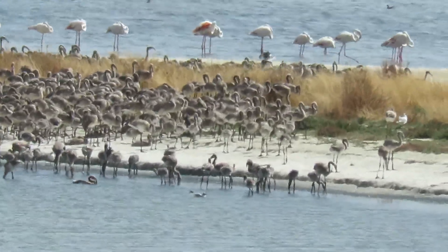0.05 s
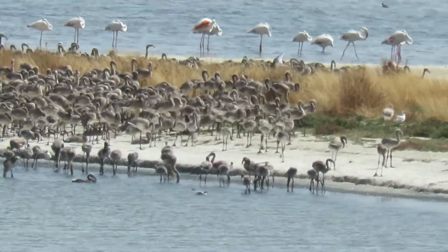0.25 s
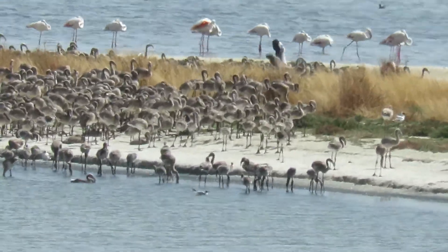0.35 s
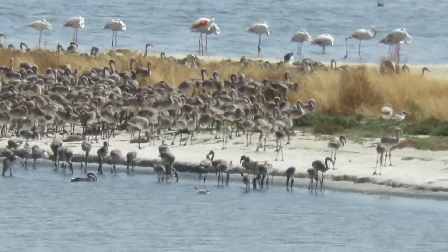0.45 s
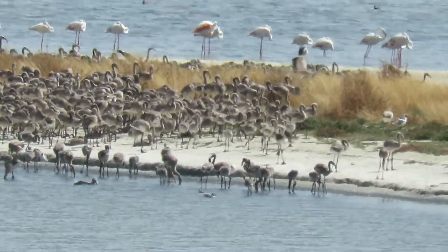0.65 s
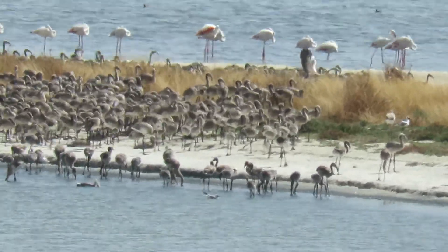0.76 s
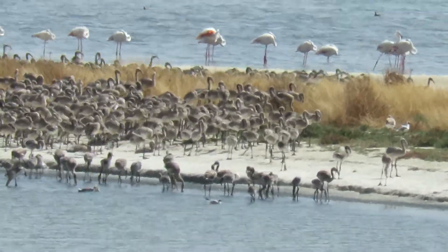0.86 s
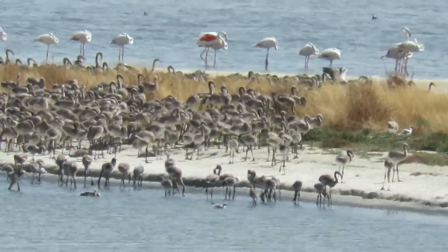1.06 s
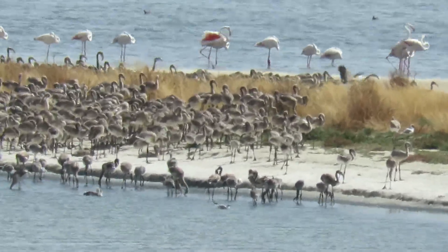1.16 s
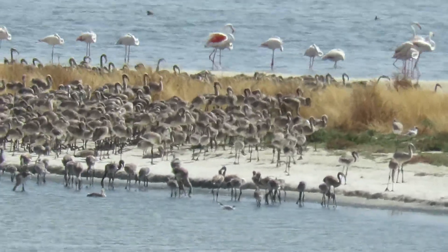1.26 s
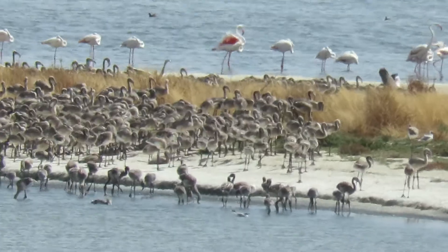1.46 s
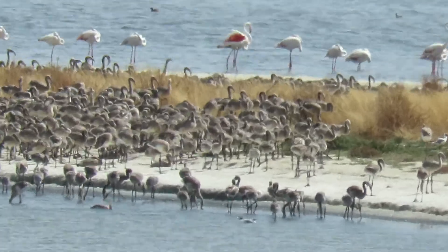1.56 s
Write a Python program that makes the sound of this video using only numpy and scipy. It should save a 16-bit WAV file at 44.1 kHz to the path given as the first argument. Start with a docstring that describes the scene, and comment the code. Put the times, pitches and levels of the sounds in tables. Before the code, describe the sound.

A hoarse flamingo caw sounds by a lake as low wind gusts buffet and briefly crackle the microphone. The wind drops and two more throbbing caws follow, with a faint hush of far flock and water behind.

```python
"""Flamingos call across a lake. From the start, over the colony's faint din and a breeze, comes a harsh caw:
a nasal harmonic voice that scoops up, throbs through a windpipe resonance and turns hoarse as it falls.
Eddies thump on the microphone and an insect buzzes briefly. The hardest gusts make the microphone
crackle, and just after half a second its port flutters. As the wind eases the caw comes twice more,
each time with short echoes off ground and water, and a faint fourth begins at the very end."""
import sys
import numpy as np
from scipy import signal
from scipy.fft import rfft, irfft
from scipy.io import wavfile
from scipy.ndimage import uniform_filter1d, minimum_filter1d

SR = 44100
rng = np.random.default_rng(int(sys.argv[2]) if len(sys.argv) > 2 else 0)


def output_pcm(signal):
    """Save a mono or channel-first signal as 16-bit PCM at the path in sys.argv[1].

    Samples are clipped to [-1, 1] before scaling.
    """
    pcm = np.clip(np.atleast_2d(signal).T, -1, 1) * 32767
    wavfile.write(sys.argv[1], SR, np.round(pcm).astype(np.int16))


N = 70560
TIME = np.arange(N) / SR

# wash of distant colony and water: frequency_hz, relative_density_db
COLONY_SPECTRUM = [(30, -4.5), (200, 6), (400, -2), (600, -3.5), (900, -5), (1300, -6.5), (2200, -12),
                   (4000, -18), (7000, -24), (10000, -29.5), (12500, -28.5), (14000, -43.5)]
# its level, which dips after the big gusts: time_s, level_db
COLONY_LEVEL = [(0, -53), (.2, -49.5), (.28, -59), (.48, -57), (.62, -58), (1.0, -59.5), (1.25, -55),
                (1.6, -54.5)]
# likeness of its left and right sides: frequency_hz, correlation
COLONY_CORRELATION = [(100, 1), (600, 1), (1500, 0.3), (4000, 0.062), (9000, 0.021)]

# wind between the thumps: time_s, level_db
BREEZE_LEVEL = [(0, -47), (.07, -42.5), (.13, -71), (.2, -38.5), (.4, -47), (.47, -40.5), (.6, -35),
                (.69, -43.5), (.79, -56.5), (.89, -49.5), (1.05, -83.5), (1.17, -64.5), (1.29, -68),
                (1.35, -46.5), (1.39, -64), (1.5, -55.5), (1.6, -56.5)]
# its spectrum: frequency_hz, relative_density_db
BREEZE_COLOUR = [(30, -28.5), (70, -8.5), (140, 1.5), (230, -4.5), (380, -2), (550, -21.5), (1000, -25.5),
                 (3000, -68.5)]

# the calls: start_s, top_pitch_hz, level_db, windpipe_gain_db, treble_gain_db, beak_end_hz, squeak_db
CAW_EVENTS = [(-.006, 521.6, -48, 1, -6, 3990, -72), (0.627, 509.6, -54, 4, 2.5, 4170, -55.5),
              (1.273, 515.2, -50.5, 6.5, 2, 3390, -48), (1.561, 605, -73, 0, 14, 3800, -64)]
# arch of every caw: age_s, share_of_top_pitch, gain_db, hoarseness (0-1)
CAW_ARCH = [(0, .63, -16, .4), (.02, .81, -2, .25), (.032, .89, 0, .1), (.048, .955, -3, .24),
            (.1, 1, 1.5, .27), (.145, .99, 1.5, .3), (.19, .93, 1.5, .36), (.245, .84, 0, .35),
            (.275, .79, -13, .5), (.31, .76, -36, .5)]
# modulation, deepening until late in the caw: age_s, pitch_swing_share, drive_swing_share
THROB_DEPTH = [(.03, 0, .1), (.08, .024, .9), (.13, .038, 1.1), (.18, .058, 1.5), (.22, .058, 1.5),
               (.27, .04, .7)]
# formants of the throat: frequency_hz, gain_db
THROAT_RESPONSE = [(500, -31.5), (850, -21.5), (1040, -4.5), (1150, 2), (1300, 4.5), (1500, -1.5),
                   (1720, 2.5), (1850, -2), (2060, -4), (2220, -12.5), (2580, -17), (2850, -34.5),
                   (4300, -25.5), (4700, -33), (5250, -22.5), (5600, -27.5), (6050, -22), (6800, -33.5),
                   (11000, -44)]
# the voice brightens as it is pushed: age_s, gain_above_4_khz_db
BRIGHTENING = [(0, -14), (.06, -5), (.11, -0.5), (.24, 0.5), (.3, 4.5)]
CAW_S, THROB_HZ, THROB_SLOWS_HZ_PER_S = .31, 60, 88
JITTER, RASP, BREATH_DB, TREBLE_FLICKER_DB = .006, .8, -1, 2.2
BEAK_HZ, BEAK_HALF_WIDTH_HZ, BEAK_DB, BEAK_OPENS_S, BEAK_TAKES_S = 3470, 230, -14.5, .16, .033
WINDPIPE_HZ, WINDPIPE_HALF_WIDTH_HZ = 1520, 85
SQUEAK_S, SQUEAK_SIGMA_S, SQUEAK_HARMONIC = .031, .006, 7
LEFT_LEAD_S, PAN_DB, SHORE_DB, SHORE_T60_S = .00003, .37, -12, .14

# eddies striking the microphone: centre_s, sigma_s, level_db, upper_edge_hz
EDDIES = [(0.022, 0.027, -47, 326), (0.068, 0.0063, -36, 360), (0.202, 0.0045, -17.5, 500),
          (0.224, 0.0048, -9.5, 644), (0.244, 0.0046, -22.5, 972), (0.254, 0.011, -17, 530),
          (0.276, 0.0038, -15, 597), (0.294, 0.011, -23, 495), (0.342, 0.0014, -24, 364),
          (.367, 0.0074, -22.5, 440.6), (0.386, 0.013, -30.5, 395), (0.423, 0.0026, -28.5, 275),
          (0.455, 0.0028, -36, 377), (0.506, 0.0056, -21, 291), (0.515, 0.0039, -22, 496),
          (0.536, 0.012, -20, 393), (0.555, 0.0065, -13.5, 629), (0.57, 0.0032, -13.5, 762),
          (0.582, 0.0033, -16, 480), (0.687, 0.0029, -33.5, 390), (0.764, 0.0015, -38.5, 366),
          (0.953, 0.0066, -43.5, 314), (0.979, 0.015, -42, 325), (1.023, 0.0069, -44.5, 320),
          (1.106, 0.0039, -50.5, 242), (1.218, 0.0061, -38.5, 268), (1.264, 0.0025, -36, 265),
          (1.412, 0.0025, -33, 164), (1.431, 0.0062, -27, 427), (1.463, 0.0036, -30.5, 398),
          (1.476, 0.0024, -28.5, 340), (1.528, 0.02, -42.5, 257)]
EDDY_LOW_EDGE_SHARE, EDDY_SIDE_DB, EDDY_SIDE_ABOVE_HZ = .31, -7.5, 446
PORT_DIP_HZ, PORT_DIP_SIGMA_HZ, PORT_DIP_DB = 558.6, 44, -10.5   # hollow just above the port's resonance

# the insect's buzz: time_s, level_db
INSECT_LEVEL = [(.11, -100), (.135, -74), (.22, -73), (.24, -77.5), (.325, -77), (.335, -110)]
INSECT_HZ, INSECT_HALF_WIDTH_HZ, INSECT_PULSE_HZ = 11900, 325, 118

# crackles of the microphone: start_s, impulse_db (before filtering)
CRACKLE_IMPULSES = [(.224, -33), (.2268, -48.5), (.2345, -34), (.239, -26.5), (0.2445, -25), (0.256, -30),
                    (0.276, -40), (0.5441, -26), (.565, -21), (.57, -34), (.586, -30)]
# ringing of the microphone port: time_s, level_db
PORT_LEVEL = [(.535, -61.5), (.541, -11), (.557, -8.5), (.563, -27.5), (.571, -6), (.578, -24.5),
              (.583, -13), (.588, -51.5)]
PORT_HZ, PORT_WANDER = 405.9, .06


def from_db(db):
    """Amplitude ratio for a level in decibels."""
    return 10 ** (np.asarray(db) / 20)


def rms_one(x):
    """Normalisation to unit power."""
    return x / np.sqrt(np.mean(x ** 2) + 1e-20)


def along(rows, t):
    """Linear interpolation of each column of a curve at times t."""
    times, *columns = np.transpose(rows)
    return [np.interp(t, times, column) for column in columns]


def burst(rows):
    """Amplitude envelope from a level curve, silent outside it."""
    return from_db(np.interp(TIME, *np.transpose(rows), left=-200, right=-200))


def at_hz(points, hz):
    """Interpolation of a spectrum on a log-frequency axis."""
    frequencies, values = np.transpose(points)
    return np.interp(np.log(hz), np.log(frequencies), values)


def filtered(x, hz, kind, order=2):
    """Causal Butterworth filter."""
    return signal.sosfilt(signal.butter(order, hz, kind, fs=SR, output="sos"), x)


def drift(hz, size=N):
    """Random fluctuation: low-passed noise of unit power."""
    return rms_one(filtered(rng.standard_normal(size + SR // 4), hz, "low")[-size:])


def stereo(mid, side):
    """Left and right as the sum and difference of mid and side."""
    return np.array([mid + side, mid - side])


def coloured_noise(spectrum, correlation):
    """Partly correlated stereo noise of unit power, summed from half-octave bands."""
    edges = 25 * 2 ** np.arange(0, 9.6, .5)
    out, white = 0, rng.standard_normal((2, 2, N))
    for k, (low, high) in enumerate(zip(edges, edges[1:])):
        mid, side = filtered(white[k % 2], [low, high], "band", order=3)
        hz = np.sqrt(low * high)
        alike = at_hz(correlation, hz)
        band = stereo(np.sqrt(1 + alike) * mid, np.sqrt(1 - alike) * side)
        out = out + from_db(at_hz(spectrum, hz)) * band
    return rms_one(out)


def colony():
    """Diffuse field: the far flock and water merge into noise, alike in both ears only in the bass."""
    db, = along(COLONY_LEVEL, TIME)
    return from_db(db) * coloured_noise(COLONY_SPECTRUM, COLONY_CORRELATION)


def breeze(lumps_db=.5):
    """Turbulence: uneven wind noise with most of its energy at low frequencies."""
    db, = along(BREEZE_LEVEL, TIME)
    envelope = from_db(db + lumps_db * drift(32))
    return envelope * coloured_noise(BREEZE_COLOUR, correlation=[(100, 1), (800, .89)])


def caw(age, top_hz, db, windpipe_db, treble_db, beak_end_hz, squeak_db):
    """Source and filter: rough, modulated harmonics excite the resonances of throat, beak and windpipe."""
    size = len(age)
    pitch_share, arch_db, hoarse = along(CAW_ARCH, age)
    pitch_swing, drive_swing = along(THROB_DEPTH, age)
    bright_db, = along(BRIGHTENING, age)
    throb_phase = 2 * np.pi * (THROB_HZ * age - .5 * THROB_SLOWS_HZ_PER_S * age ** 2) + .75
    throb = -np.sin(throb_phase) - .3 * np.sin(2 * throb_phase)   # climbs slowly and drops fast
    effort = from_db(db + arch_db) * (1 + .4 * drive_swing * throb)
    pitch = top_hz * pitch_share * (1 + pitch_swing * throb + JITTER * drift(130, size))
    phase = 2 * np.pi * np.cumsum(pitch) / SR
    beak_opening = np.clip((age - BEAK_OPENS_S) / BEAK_TAKES_S, 0, 1)
    beak_hz = BEAK_HZ + (beak_end_hz - BEAK_HZ) * beak_opening
    source, voice = 0, 0
    for k in range(1, 23):
        hz = k * pitch
        throat = from_db(at_hz(THROAT_RESPONSE, hz) + bright_db * (hz > 4000))
        beak = from_db(BEAK_DB) / (1 + ((hz - beak_hz) / BEAK_HALF_WIDTH_HZ) ** 4)
        treble_share = np.clip(np.log2(hz / 2000), 0, 1)
        treble = from_db((treble_db + TREBLE_FLICKER_DB * drift(60, size)) * treble_share)
        # random modulation spreads each harmonic into noisy sidebands
        rasp = RASP * hoarse * np.sqrt(k / 2)
        grain = rasp * (drift(91, size) + 1j * drift(110, size))
        breath = from_db(BREATH_DB) * hoarse * drift(270, size)
        carrier = np.exp(1j * (k * phase + 2 * np.pi * rng.random()))
        partial = effort / np.sqrt(.5 + rasp ** 2) * np.real((1 + grain + breath) * carrier)
        source = source + partial
        voice = voice + (throat + beak) * treble * partial
    squeak_envelope = from_db(squeak_db) * np.exp(-.5 * ((age - SQUEAK_S) / SQUEAK_SIGMA_S) ** 2)
    squeak = squeak_envelope * np.sin(SQUEAK_HARMONIC * phase)
    drive = (1 + drive_swing * np.cos(throb_phase)) ** 2 / (1.5 + drive_swing)
    return voice + from_db(windpipe_db) * windpipe(source * drive) + squeak


def windpipe(source):
    """Resonance: a narrow pass band that the third harmonic swings in and out of."""
    band_hz = [WINDPIPE_HZ - WINDPIPE_HALF_WIDTH_HZ, WINDPIPE_HZ + WINDPIPE_HALF_WIDTH_HZ]
    return filtered(source, band_hz, "band")


def shore(x):
    """Scattering: echoes off ground and water decay exponentially, different in each ear."""
    t = TIME[:SR // 3]
    echoes = rng.standard_normal((2, len(t))) * from_db(-60 * t / SHORE_T60_S)
    echoes /= np.sqrt(np.sum(echoes ** 2, axis=1, keepdims=True))
    return signal.fftconvolve(x[None], echoes, axes=1)[:, :N]


def flamingos():
    """Interaural time and level differences set the caws slightly off centre, amid their echoes."""
    calls, age = np.zeros(N), np.arange(SR // 2) / SR
    for start_s, *voice in CAW_EVENTS:
        during = (TIME >= start_s) & (TIME < start_s + CAW_S)
        calls[during] += np.interp(TIME[during] - start_s, age, caw(age, *voice))
    left = np.interp(TIME + LEFT_LEAD_S, TIME, calls)
    direct = np.array([left, calls]) * from_db([[-PAN_DB], [PAN_DB]])
    return direct + from_db(SHORE_DB) * shore(calls)


def thumps():
    """Turbulent pressure: each eddy is a short swell of low noise, alike on both sides in the bass."""
    out, size = np.zeros((2, N)), SR // 5
    t = (np.arange(size) - size // 2) / SR
    hz = np.arange(size // 2 + 1) * SR / size + 1e-3
    port_dip = from_db(PORT_DIP_DB * np.exp(-.5 * ((hz - PORT_DIP_HZ) / PORT_DIP_SIGMA_HZ) ** 2))
    side_gain = from_db(EDDY_SIDE_DB) * hz ** 2 / (hz ** 2 + EDDY_SIDE_ABOVE_HZ ** 2)
    for centre_s, sigma_s, db, edge_hz in EDDIES:
        swell = np.exp(-.5 * (t / sigma_s) ** 2)
        eddy = rfft(rng.standard_normal((2, size)) * swell)
        eddy /= np.sqrt(np.abs(eddy) ** 2 + .2 * np.sum(swell ** 2))   # flatten chance spectral peaks
        high_pass = 1 / np.hypot(1, (EDDY_LOW_EDGE_SHARE * edge_hz / hz) ** 2.97)
        rolloff = 1.57 - .21 * db   # gentler eddies lose their treble more steeply
        low_pass = 1 / np.hypot(1, (hz / edge_hz) ** rolloff)
        mid, side = eddy * high_pass * low_pass * port_dip
        puff = stereo(irfft(mid, size), irfft(side * side_gain, size))
        puff = rms_one(puff * swell ** .1) * np.sqrt(np.mean(swell ** 2))   # taper; give the swell's power
        out += from_db(db) * np.array([np.interp(TIME - centre_s, t, channel) for channel in puff])
    return out


def insect():
    """Amplitude modulation: pulses in a very high, narrow noise band make a buzz from the grass."""
    band_hz = [INSECT_HZ - INSECT_HALF_WIDTH_HZ, INSECT_HZ + INSECT_HALF_WIDTH_HZ]
    mid, side = filtered(rng.standard_normal((2, N)), band_hz, "band", order=3)
    pulses = (1 + np.cos(2 * np.pi * INSECT_PULSE_HZ * TIME)) ** 2
    return burst(INSECT_LEVEL) * rms_one(stereo(mid, .5 * side) * pulses)


def port_crackle(corner_hz=900):
    """Impulse response: the hardest gusts jolt the microphone port into exponentially decaying clicks."""
    impulses = np.zeros(N)
    for start_s, db in CRACKLE_IMPULSES:
        impulses[int(start_s * SR)] = from_db(db)
    pole = np.exp(-2 * np.pi * corner_hz / SR)
    clicks = signal.lfilter([1], [1, -pole], impulses + 1e-18)
    return filtered(clicks, 2900, "low")


def port_flutter():
    """Flow-driven resonance: a hard gust rings the microphone port at a wandering pitch."""
    pitch = PORT_HZ * (1 + PORT_WANDER * drift(120))
    return burst(PORT_LEVEL) * np.sqrt(2) * np.sin(2 * np.pi * np.cumsum(pitch) / SR)


def scene():
    """Superposition: birds and insect beyond, wind at the microphone."""
    beyond = flamingos() + colony() + insect()
    return beyond + breeze() + thumps() + port_crackle() + port_flutter()


def record(dry, ceiling_db=-.5, window_s=.003, stopband_hz=15194):
    """Peak and band limiting: a quick gain reduction holds the peaks, and a steep filter cuts the top."""
    size = int(window_s * SR)
    allowed_gain = 1 / np.maximum(1, np.abs(dry).max(axis=0) / from_db(ceiling_db))
    gain = uniform_filter1d(minimum_filter1d(allowed_gain, size), size)
    low_pass = signal.cheby2(14, 70, stopband_hz, fs=SR, output="sos")
    return signal.sosfilt(low_pass, gain * dry)


dry = scene()
out = record(dry)
output_pcm(out)
```